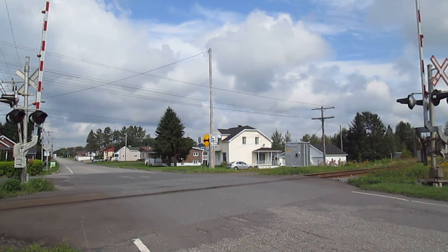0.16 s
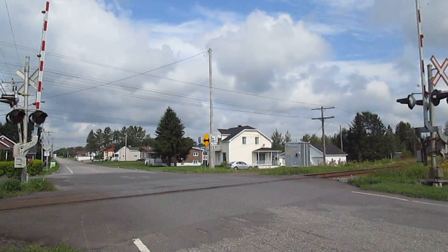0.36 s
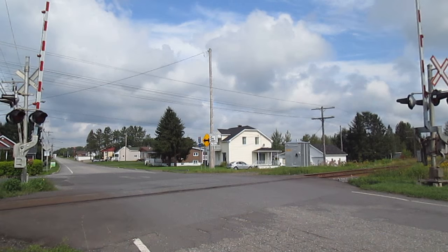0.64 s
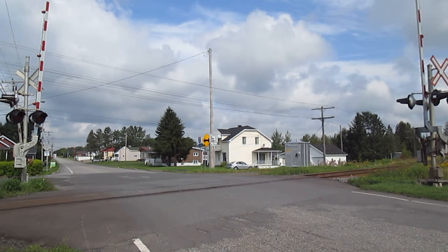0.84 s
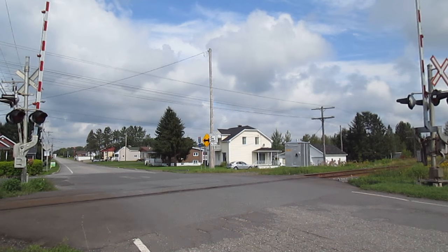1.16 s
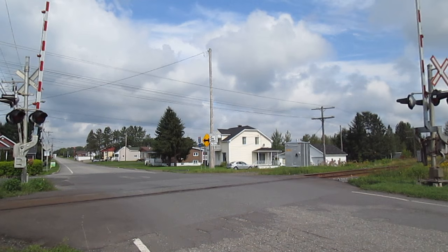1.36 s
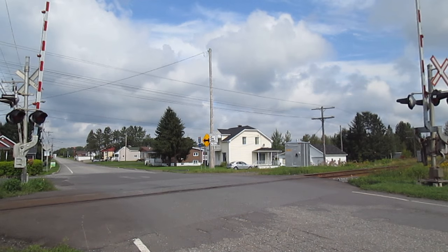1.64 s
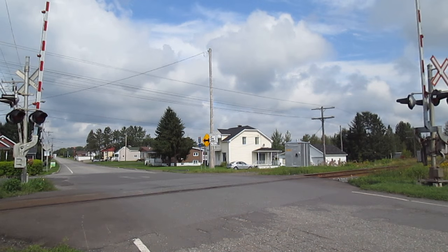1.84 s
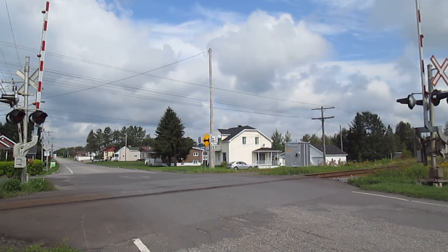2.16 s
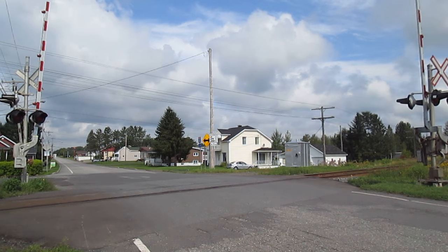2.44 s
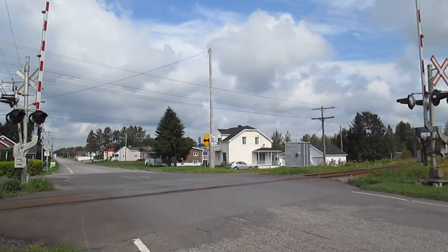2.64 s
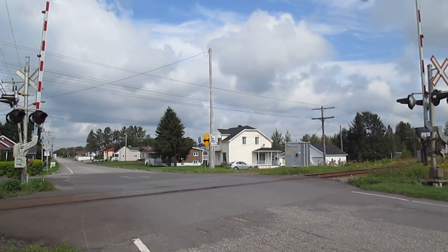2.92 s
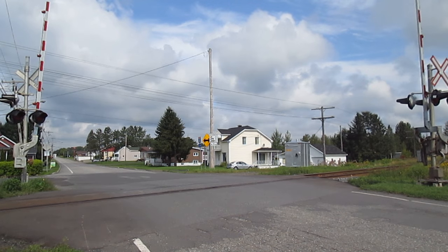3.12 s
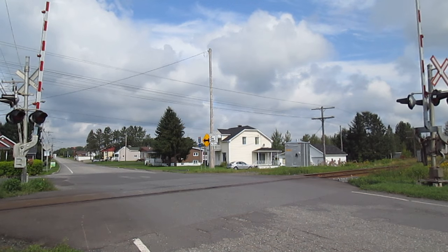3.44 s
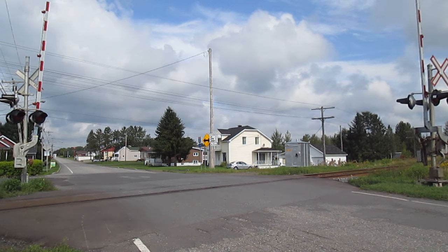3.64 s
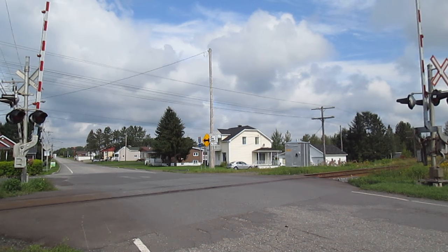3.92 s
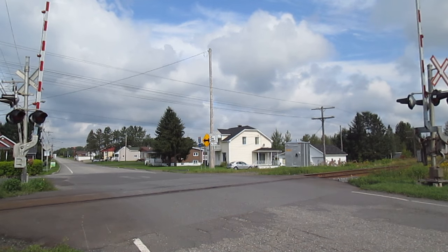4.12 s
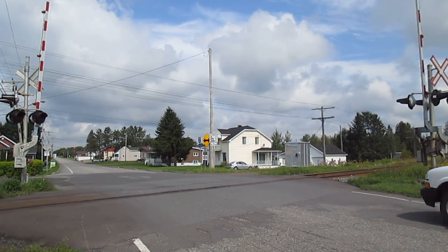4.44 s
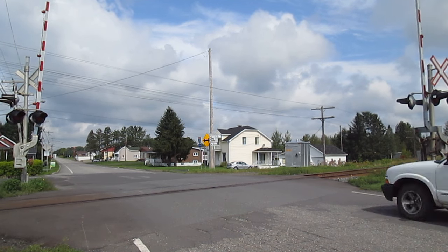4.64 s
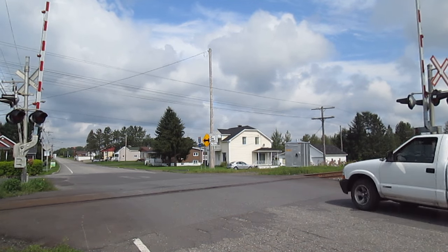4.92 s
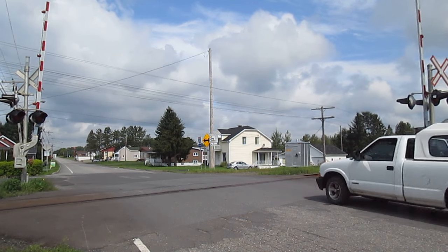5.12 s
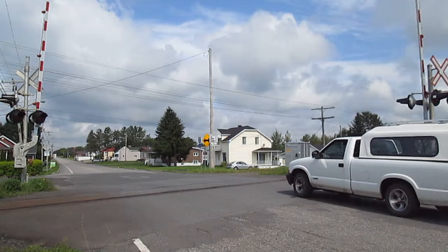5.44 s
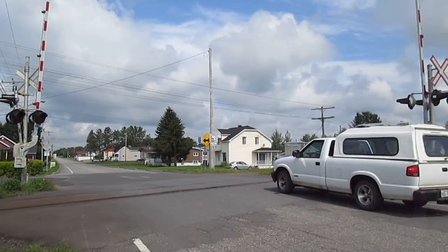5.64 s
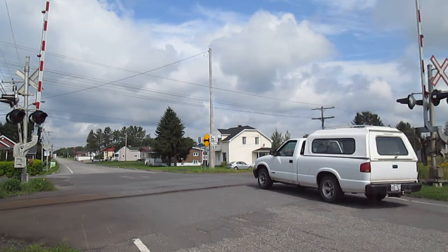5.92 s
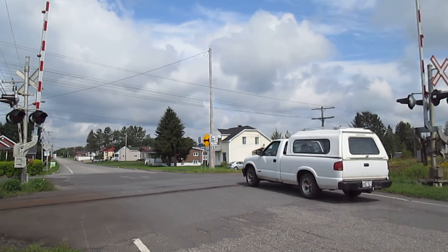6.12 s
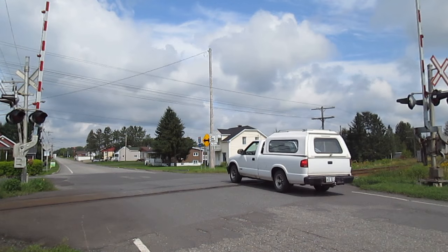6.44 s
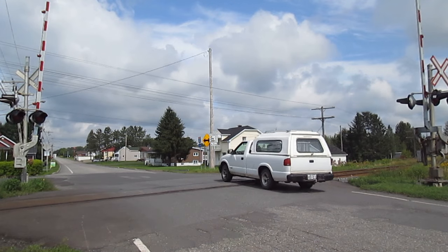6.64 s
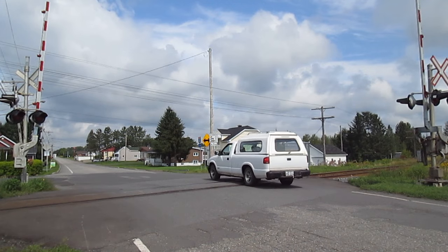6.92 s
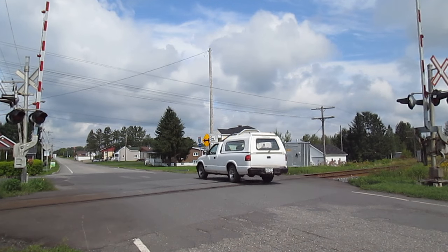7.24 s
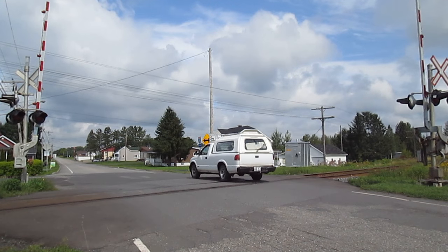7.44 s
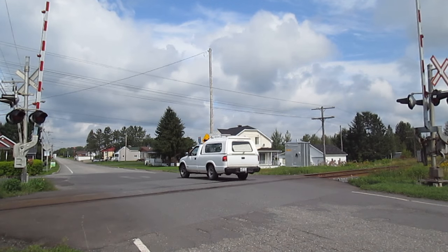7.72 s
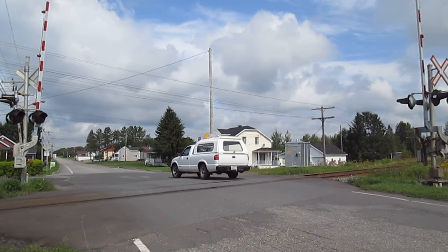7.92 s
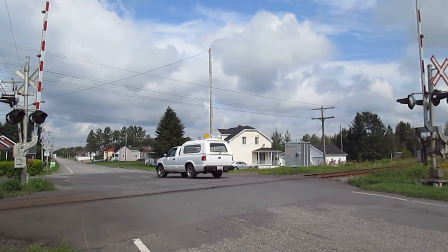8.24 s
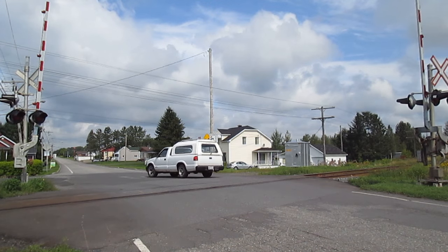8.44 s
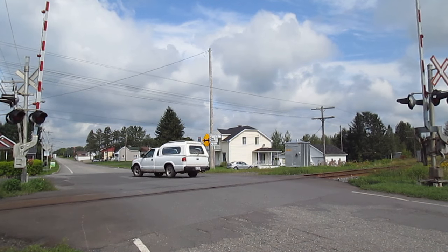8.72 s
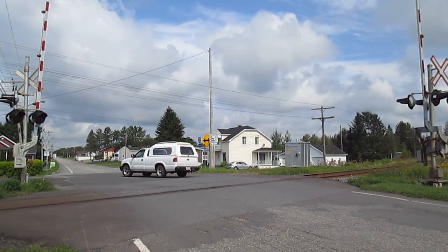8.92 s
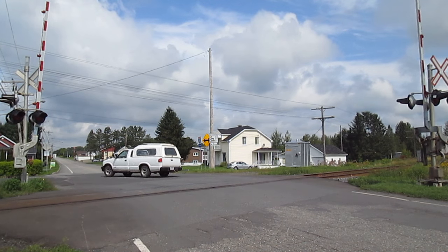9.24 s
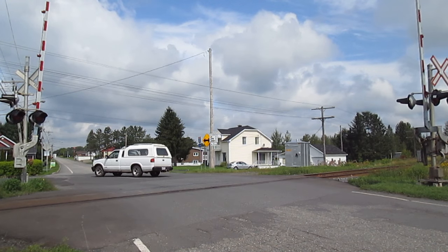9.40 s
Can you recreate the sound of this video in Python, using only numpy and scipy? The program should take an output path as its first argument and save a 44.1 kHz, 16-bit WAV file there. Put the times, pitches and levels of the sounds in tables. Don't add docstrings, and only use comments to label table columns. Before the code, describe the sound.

Windy open roadside, handheld camera sound. Low gusts flutter and slap the microphone while a far diesel hums low and steady. Tyres approach with an airy roar and hiss, joined by wavering gear whine and exhaust murmur. After the close pass the truck knocks across the rails, a few sharp ticks follow, and the wind eases as the tyres move away.

```python
import sys
import numpy as np
from scipy import signal
from scipy.io import wavfile
from scipy.ndimage import uniform_filter1d

SR = 44100
rng = np.random.default_rng(int(sys.argv[2]) if len(sys.argv) > 2 else 0)


def store_pcm(level_fs):
    pcm = np.round(np.clip(level_fs, -1, 1) * 32767).astype(np.int16)
    wavfile.write(sys.argv[1], SR, np.atleast_2d(pcm).T)


def field_ratio(decibels):
    return 10 ** (np.asarray(decibels, dtype=float) / 20)


N = 422037
HOP = 512
HZ = np.fft.rfftfreq(2048, 1 / SR)
FRAME_S = np.arange(N // HOP + 5) * HOP / SR


def evened(x):
    return x / np.sqrt(np.mean(x ** 2) + 1e-20)


def read(points, hz):
    f, value = np.transpose(points)
    return np.interp(np.log(hz + 1), np.log(f + 1), value, left=-150, right=-150)


def along(rows, t):
    s, *columns = np.transpose(rows)
    return [np.interp(t, s, c) for c in columns]


def unit(points, hz):
    g = field_ratio(read(points, hz))
    return (g / np.sqrt(np.sum(g ** 2)))[:, None]


def noise(magnitude, patchy_db, wide, long):
    a, b, patches = rng.standard_normal(magnitude.shape[::-1] + (3,)).T
    patches = uniform_filter1d(patches, wide, 0)
    patches = evened(uniform_filter1d(patches, long, 1))
    z = (a + 1j * b) * magnitude * field_ratio(patchy_db * patches)
    return signal.istft(z, nperseg=2048, noverlap=2048 - HOP)[1][:N] * np.sqrt(3 / 2)


def fuzzy(hz, smear_hz, share):
    r = np.exp(-np.pi * smear_hz / SR)
    a, b = rng.standard_normal((2, N + SR))
    drift = signal.lfilter([1], [1, -2 * r, r * r], a + 1j * b)[SR:]
    drift = 1 + share * drift / np.sqrt(np.mean(abs(drift) ** 2))
    cycles = np.cumsum(hz * np.ones(N)) / SR + rng.random()
    return evened((drift * np.exp(2j * np.pi * cycles)).real)


def tyres():
    # start_s, level_db, brightness_db (high while tyres face the microphone)
    passing = [(0, -38.5, 1), (.6, -37, 1), (.9, -37, 2), (1.45, -35.5, 1), (2.1, -33, 1),
               (2.6, -33.5, 1.5), (3.2, -32.5, -1), (3.8, -32, -2), (4.35, -34, -2.5), (4.7, -35.3, -0.5),
               (5.5, -35, -2), (5.9, -36.5, 0.5), (6.7, -37.5, -.5), (7.25, -38, -2), (7.6, -40.5, 1.5),
               (8.1, -40.5, 1), (8.6, -38, 0), (9.57, -37, 1)]
    # pitch_hz, level_db (per Hz)
    roar = [(170, -33), (330, -2), (500, -1), (1000, -2), (1300, -8), (1650, -18), (2600, -39)]
    # pitch_hz, level_db (per Hz)
    hiss = [(1000, -30), (1600, 1), (2000, 3), (3000, -6), (4200, -15), (5300, -33), (7900, -56)]
    # pitch_hz, level_db (per Hz)
    fizz = [(3200, -27), (4600, 0.5), (5600, -2.5), (7400, -7.5), (10000, -19), (13000, -26), (16000, -30)]
    # start_s, comb_spacing_hz, echo_share (0-1)
    bounce = [
        (0, 2250, 0.23),
        (.9, 2080, 0.17),
        (2.1, 1880, 0.15),
        (2.9, 1610, 0),
        (3.6, 1300, 0.08),
        (4.6, 1410, 0.14),
        (6, 1460, 0.28),
        (7.5, 1950, 0),
        (9.57, 2150, 0),
    ]
    roar_db, bright_db = along(passing, FRAME_S)
    hiss_db = roar_db - 12 + bright_db
    fizz_db = roar_db - 30.5 + 1.4 * bright_db
    layers = (roar, roar_db), (hiss, hiss_db), (fizz, fizz_db)
    power = sum((unit(points, HZ) * field_ratio(db)) ** 2 for points, db in layers)

    spacing_hz, share = along(bounce, FRAME_S)
    share = np.clip(share, 0, .9) * np.exp(-HZ / 9000)[:, None]
    comb = abs(1 + share * np.exp(2j * np.pi * HZ[:, None] / spacing_hz)) ** 2 / (1 + share ** 2)
    return noise(np.sqrt(power * comb), patchy_db=0.95, wide=16, long=26)


def truck():
    # start_s, pitch_hz, level_db
    whine = [
        (2.0, 500, -50),
        (2.3, 490, -38.5),
        (2.6, 487, -44),
        (3.0, 479.5, -52),
        (3.55, 469, -39.5),
        (4.0, 468.6, -52),
        (4.7, 460.4, -45),
        (5.3, 454, -59),
    ]
    # start_s, pitch_hz, level_db
    exhaust = [
        (3.4, 245.8, -48),
        (3.65, 246, -37),
        (3.9, 240, -48),
        (4.2, 238, -42),
        (4.6, 227, -57),
        (5.0, 212, -54),
        (5.3, 210.7, -39.5),
        (5.75, 226.3, -42.5),
        (6.4, 208, -54),
    ]
    # start_s, pitch_hz, level_db
    firing = [
        (2.6, 78.1, -46),
        (3.15, 71.9, -37),
        (3.5, 70, -45),
        (5.0, 67.84, -40),
        (5.4, 71.8, -33),
        (5.8, 75, -37.5),
        (6.3, 70, -34),
        (6.7, 68, -54),
    ]
    t, out = np.arange(N) / SR, np.zeros(N)
    for rows, smear_hz in ((whine, 14), (exhaust, 9), (firing, 7)):
        hz, db = along(rows, t)
        start_s, end_s = rows[0][0], rows[-1][0]
        near = np.interp(t, [start_s, start_s + .2, end_s - .2, end_s], [0, 1, 1, 0])
        out += near * field_ratio(db) * fuzzy(hz, smear_hz, share=.9)
    return out


def ticks():
    # start_s, peak_db, ring_hz, t60_s
    knocks = [(3.3293, -43, 3900, .02), (6.553, -32, 3250, .028), (6.5523, -27, 1750, .045),
              (6.5523, -24, 1100, .035), (6.5523, -33, 2400, .025), (6.5535, -51, 5700, .03),
              (6.5595, -34, 2600, .02), (6.562, -45, 4200, .025), (6.570, -34, 1500, .025),
              (7.2695, -39, 3650, .045), (7.270, -39, 2300, .03), (7.333, -48, 4000, .04),
              (7.905, -43, 3800, .025), (7.9563, -37, 3000, .03), (8.0571, -43, 3500, .02),
              (8.286, -44, 3400, .03), (8.326, -30, 2750, .015), (8.329, -43, 3300, .012),
              (8.5068, -32, 3400, .014), (8.5068, -26, 950, .04), (8.512, -40, 3300, .012),
              (8.6294, -50, 5700, .02)]
    modes = (.85, .3), (.94, .45), (1, .7), (1.08, .35)
    t, out = np.arange(3000) / SR, np.zeros(N + 3000)
    for s, db, hz, t60 in knocks:
        ring = sum(share * np.sin(2 * np.pi * hz * detune * t) for detune, share in modes)
        ring *= field_ratio(db - 60 * t / t60) * (1 - np.exp(-t / .0004))
        for lag_s, share in ((0, 1), (.0065, .25)):
            out[round((s + lag_s) * SR):][:3000] += share * ring
    return out[:N]


def gusts(t):
    # start_s (centre), level_db, half_length_s,
    # eddy_pitch (-1 heave, 0 buffeting, 1 flutter)
    blows = [(0.18, -32, 0.13, -0.37), (0.43, -26, 0.066, 0.037), (0.75, -30.5, 0.22, -0.43),
             (0.96, -28, 0.049, 0.66), (1.19, -31.4, 0.18, -1.07), (1.62, -24.5, 0.058, -1.35),
             (1.74, -24.5, 0.063, 0.32), (2.01, -33.5, 0.25, -0.65), (2.46, -26.5, 0.071, 0.15),
             (2.77, -26.5, 0.172, -0.37), (2.96, -25.5, 0.047, 0.28), (3.21, -26.5, 0.12, -0.37),
             (3.53, -31, 0.045, -0.47), (3.71, -27, 0.24, 0.061), (3.76, -30, 0.037, -1.18),
             (3.93, -27, 0.036, 0.12), (4.12, -26, 0.05, -0.2), (4.38, -27.5, 0.22, -0.58),
             (4.52, -28, 0.049, 1.3), (4.9, -28.5, 0.1, -0.17), (5.12, -24, 0.04, -0.34),
             (5.27, -33, 0.25, -0.19), (5.59, -34, 0.045, 0.11), (5.98, -27.7, 0.185, -0.29),
             (6.12, -29, 0.054, -0.6), (6.26, -25.5, 0.077, -0.25), (6.69, -33.5, 0.19, 0.02),
             (7.17, -33, 0.165, 0.017), (7.54, -35, 0.25, -0.53), (8.52, -38, 0.04, -0.16)]
    # start_s, level_db
    steady = [
        (0, -41.4),
        (1.5, -36.5),
        (3, -36),
        (4.5, -37),
        (6.3, -41),
        (6.5, -39.5),
        (8, -42.5),
        (9.57, -39.5),
    ]
    # level_db of heave, buffeting, flutter
    tilt_db = (-2, -1, 2)
    eddy_spread = 0.88
    s, db, half_s, eddy = np.transpose(blows)
    bell = np.exp(-((t - s[:, None]) / np.maximum(half_s, .02)[:, None]) ** 2)
    swell = field_ratio(2 * db)[:, None] * bell
    share = np.exp(-((np.arange(-1, 2)[:, None] - eddy) / eddy_spread) ** 2)
    breeze = field_ratio(along(steady, t)[0] + np.array(tilt_db)[:, None])
    return np.sqrt(breeze ** 2 + share @ swell)


def wind():
    # pitch_hz, level_db (per Hz)
    heave = [(8, -31), (22, -12), (35, 4), (55, 4), (70, -7.5), (110, -36)]
    # pitch_hz, level_db (per Hz)
    buffet = [(40, -23), (62, -1.5), (75, 0), (105, 0.5), (135, -7.5), (170, -25), (260, -43)]
    # pitch_hz, level_db (per Hz)
    flutter = [(90, -31), (135, -2), (165, -4), (250, -4.5), (320, -12), (460, -25.5), (750, -53)]
    flat, out, t = np.ones(len(FRAME_S)), np.zeros(N), np.arange(N) / SR
    for points, level in zip((heave, buffet, flutter), gusts(FRAME_S)):
        air = noise(unit(points, HZ) * flat, patchy_db=1.5, wide=3, long=5)
        power = uniform_filter1d(uniform_filter1d(air ** 2, size=3000), size=3000)
        out += np.interp(t, FRAME_S, level) * air / np.sqrt(power + .05)
    return out


def pops():
    # start_s, peak_db
    slaps = [
        (0.937, -19.0),
        (1.062, -20.0),
        (1.744, -14.0),
        (2.823, -16.0),
        (3.644, -18.0),
        (3.759, -14.0),
        (5.071, -19.0),
        (5.129, -17.0),
        (5.623, -21.0),
    ]
    push_s, rebound_s, rebound_half_s = .0015, .006, .004
    t, out = np.arange(-400, 1000) / SR, np.zeros(N)
    push = np.exp(-(t / push_s) ** 2)
    rebound = push_s / rebound_half_s * np.exp(-((t - rebound_s) / rebound_half_s) ** 2)
    for s, db in slaps:
        out[round(s * SR) - 400:][:len(t)] += field_ratio(db) * (push - rebound)
    return out


def diesel():
    # multiple (of firing rate), level_db, smear_hz
    orders = [
        (1, -47, 6),
        (1.42, -45, 10),
        (2, -51, 5.3),
        (3, -39.5, 14.3),
        (4, -45.5, 12),
        (5, -55.5, 7.1),
        (6, -46.5, 7.6),
        (7, -51.5, 7.5),
    ]
    firing_hz = 68.82
    return sum(field_ratio(db) * fuzzy(firing_hz * k, smear_hz, share=.45) for k, db, smear_hz in orders)


def far_traffic():
    # pitch_hz, level_db (per Hz)
    wash = [(10, -32), (32, 2.5), (100, -4.5), (200, -4.5), (330, -9), (1000, -11), (1450, -18.5),
            (2000, -24), (3000, -28.5), (4500, -36.5), (7000, -47.5), (9500, -51), (12000, -59),
            (16000, -65.5)]
    flat = np.ones(len(FRAME_S))
    return field_ratio(-36) * noise(unit(wash, HZ) * flat, patchy_db=0.66, wide=22, long=32)


def scene():
    return (tyres() + truck() + ticks() + wind() + pops() + diesel() + far_traffic())[None]


def roll_off(x):
    return signal.sosfilt(signal.butter(12, 15730, fs=SR, output="sos"), x)


def record(dry):
    notch_hz, notch_width_hz = 7852, 140
    comb_hz, comb_db = 29.97, -91
    b, a = signal.iirnotch(notch_hz, notch_hz / notch_width_hz, SR)
    t = np.arange(N) / SR
    lines = np.zeros(N)
    for k in (*range(-6, 0), *range(1, 8)):
        db = comb_db - 4.5 * np.log2(abs(k)) - 7.7 * (k < 0)
        lines += field_ratio(db) * np.sin(2 * np.pi * ((notch_hz + k * comb_hz) * t + rng.random()))
    fade_in = np.minimum(t / 0.00079, 1)
    return roll_off(fade_in * (signal.lfilter(b, a, dry) + lines))


dry = scene()
out = record(dry)
store_pcm(out)
```